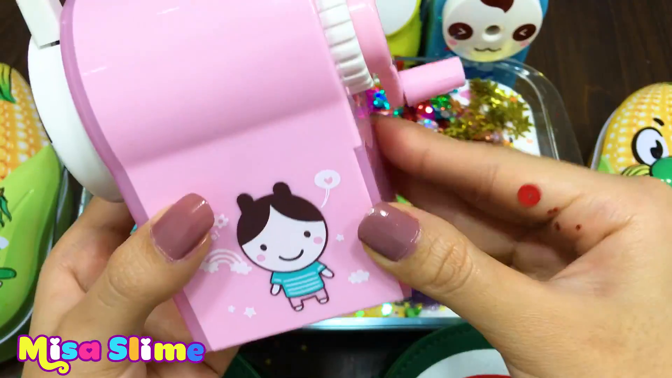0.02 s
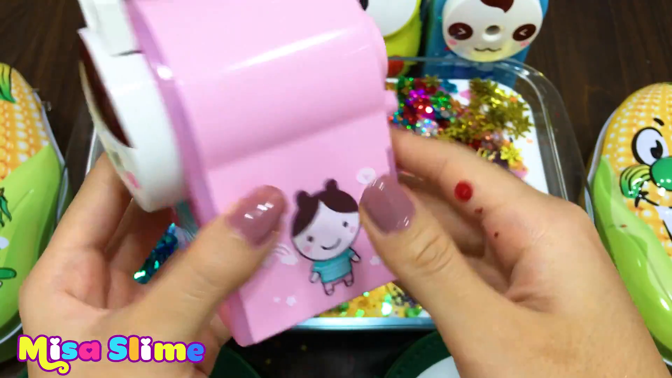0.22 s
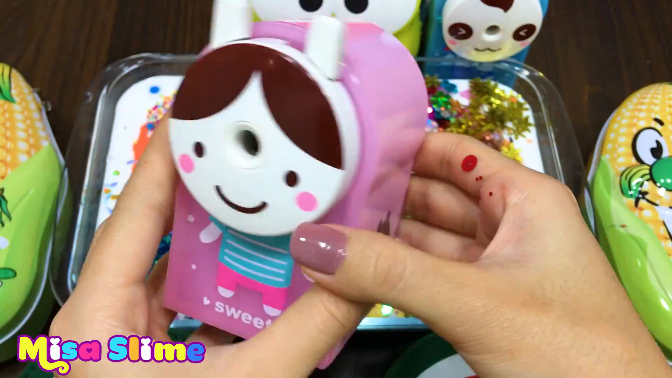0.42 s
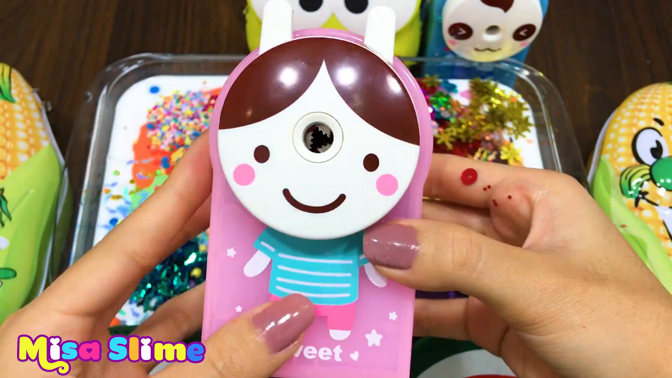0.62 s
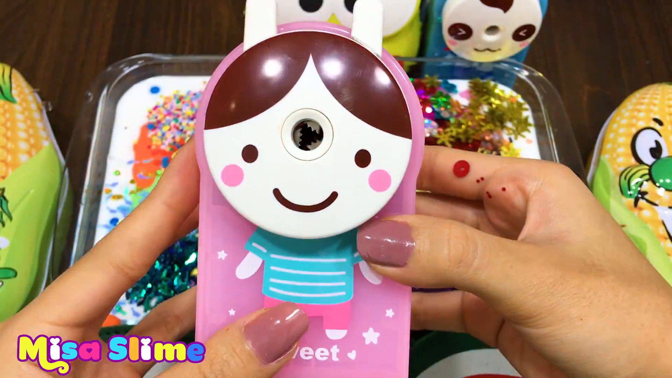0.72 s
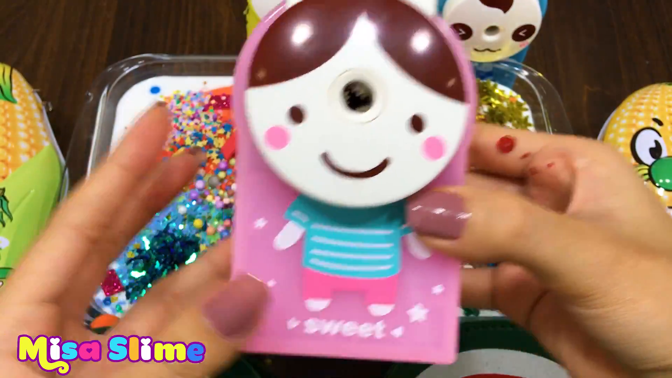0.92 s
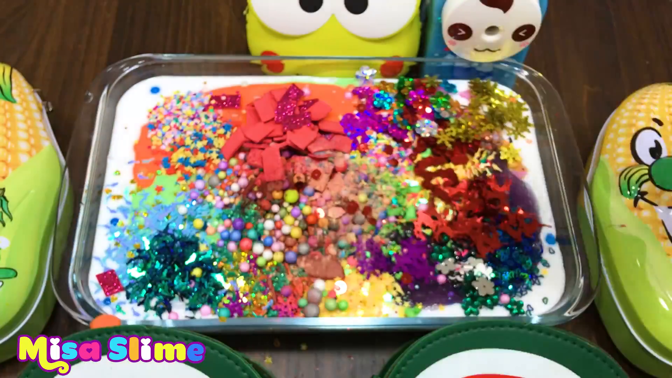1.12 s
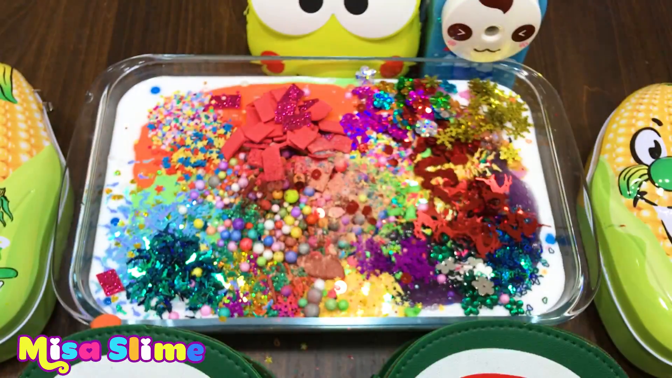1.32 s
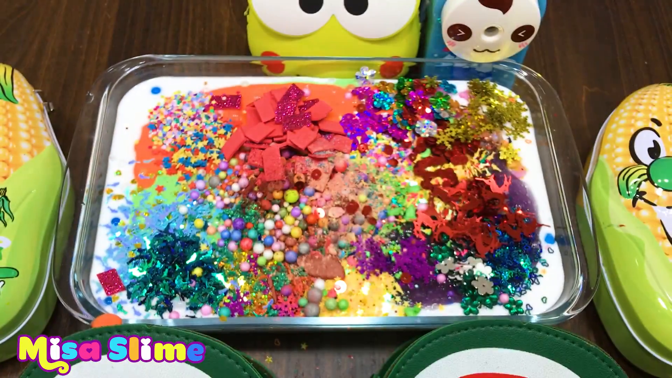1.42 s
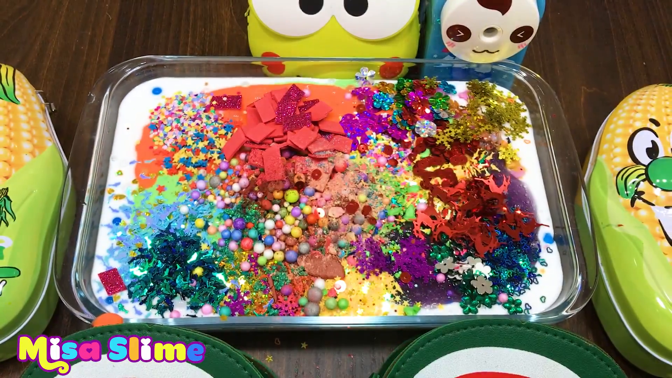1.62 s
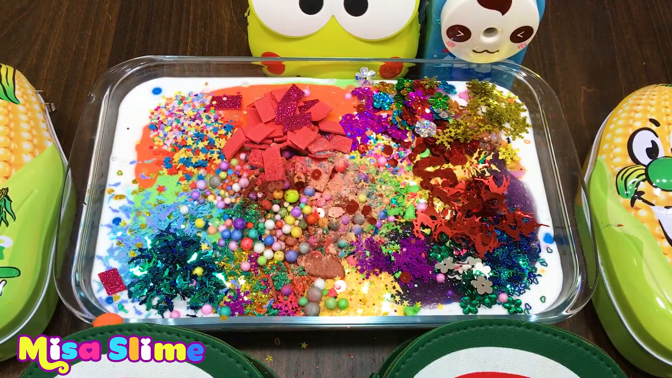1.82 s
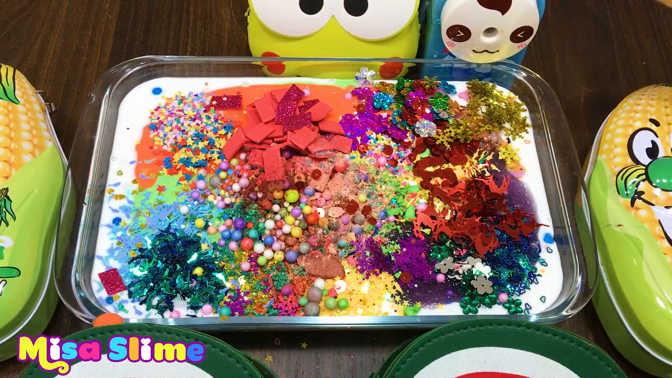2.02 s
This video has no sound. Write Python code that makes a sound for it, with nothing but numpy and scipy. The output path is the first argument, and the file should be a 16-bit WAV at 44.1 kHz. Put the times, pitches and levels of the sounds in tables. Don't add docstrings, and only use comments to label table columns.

```python
import sys
import numpy as np
from scipy import signal
from scipy.fft import rfft, irfft
from scipy.io import wavfile
from scipy.ndimage import uniform_filter1d

SR = 44100
rng = np.random.default_rng(int(sys.argv[2]) if len(sys.argv) > 2 else 0)


def master(y):
    cut = np.clip(np.atleast_2d(y).T, -1, 1)
    pcm = np.round(cut * 32767)
    wavfile.write(sys.argv[1], SR, pcm.astype(np.int16))


def field_ratio(decibels):
    return 10 ** (np.asarray(decibels, dtype=float) / 20)


N = 92610
LEAD = 6615

# ratio_to_pitch, level_db
SHELL_MODES = [(0.997, -5.5), (.66, -17), (1.3, -18), (1.4, -20.5), (1.9, -30)]
# ratio_to_pitch, level_db
EDGE_MODES = [(1, 1.5), (0.81, -8.5), (0.89, -4), (1.2, -4.5), (1.7, -20.5)]


def drawer(crack_db, hold):
    # start_s, peak_db, pitch_hz, ring_s
    slide_knocks = [(0.0238, -31, 993, 0.03), (.184, -33.5, 1900, 0.036), (0.193, -24, 1375, 0.0046),
                    (.197, -22, 2047, 0.017), (0.2185, -23, 2616, 0.008), (0.2205, -11, 1950, 0.023),
                    (.2295, -24.5, 1935, 0.019), (.2415, -20, 1900, 0.0088), (0.2454, -3.5, 1608, 0.01),
                    (0.246, -13, 1073, 0.017), (0.2475, -11, 2150, 0.0097), (0.2483, -8.5, 2708, 0.0072),
                    (.2587, -9.5, 2234, 0.015), (.259, -16, 1303, 0.016), (0.2716, -10, 1405, 0.0081),
                    (0.273, -11.5, 1183, 0.01), (.272, -10, 2225, 0.014)]
    return struck(slide_knocks, SHELL_MODES, crack_db, hold)


def catch(crack_db):
    snap_starts = [.1921, .1995, .2206, .2361, .2414, .2438, .2446, .2453, .2472, .2587, .2716, .2718, .272]
    # peak_db, pitch_hz, ring_s
    snap_sounds = [(-41, 5000, .015), (-43, 6000, 0.0029), (-27.5, 3400, 0.0024), (-34, 5100, 0.006),
                   (-27, 11000, 0.0038), (3, 10600, 0.0075), (-18.5, 5000, 0.006), (-17, 4150, 0.021),
                   (-8, 11400, 0.0056), (-21, 4500, 0.0022), (-7.5, 2700, 0.0027), (-20.5, 5300, 0.012),
                   (-22, 12000, 0.0039)]
    snaps = [(s, *sound) for s, sound in zip(snap_starts, snap_sounds)]
    return struck(snaps, EDGE_MODES, crack_db)


def shell_knocks():
    # start_s, peak_db, pitch_hz, ring_s
    earlier = [
        (-.09, -11, 1030, 0.0058),
        (-.08, -31, 4500, 0.0041),
        (-0.088, -11, 1790, 0.0082),
        (-0.0029, -17.5, 2100, 0.024),
        (-.05, -33.5, 6400, 0.003),
    ]
    # start_s, peak_db, pitch_hz, ring_s
    closing = [(0.023, -28, 2010, 0.018), (0.072, -39, 1930, 0.017), (0.0964, -36.5, 1310, 0.0095),
               (0.1033, -31.5, 1230, 0.01), (0.122, -37, 1270, 0.0095), (0.126, -46, 2060, 0.0092),
               (0.148, -37.5, 1936, 0.047), (0.55, -34, 1750, 0.0054), (0.574, -30.5, 1500, 0.004),
               (0.583, -39, 1490, 0.021), (0.594, -33, 1600, 0.0069), (0.601, -34.5, 1517, 0.012),
               (0.647, -52.5, 1475, 0.012), (0.7204, -31, 1950, 0.007), (0.741, -48, 1400, 0.015),
               (0.768, -31, 1480, 0.0097), (0.785, -36, 1452, 0.0098), (0.794, -42, 1300, 0.008),
               (0.883, -51, 1814, 0.021), (0.903, -52, 1660, 0.016), (0.933, -51, 1797, 0.013)]
    # start_s, peak_db, pitch_hz, ring_s
    setting_aside = [(1.13, -63, 2200, 0.012), (1.142, -58.5, 1698, 0.012), (1.162, -56, 1500, 0.01),
                     (1.182, -52.5, 1206, 0.0089), (1.183, -54, 2480, 0.0082), (1.198, -49.5, 2184, 0.0091),
                     (1.2575, -47, 1997, 0.0055), (1.27, -53, 1300, 0.012), (1.243, -51, 1410, 0.0085),
                     (1.26, -48, 1346, 0.007), (1.268, -47, 2100, 0.0086), (1.363, -53, 3038, 0.008),
                     (1.372, -56, 3200, 0.0082), (1.374, -55.5, 1380, 0.012), (1.44, -54.5, 1400, 0.0093),
                     (1.5103, -35, 1539, 0.0062), (1.5491, -36, 1248, 0.0067), (1.5505, -43, 2490, 0.0068),
                     (1.6631, -30.5, 1875, 0.0157), (1.665, -45.5, 1897, 0.16), (1.676, -41, 1998, 0.014),
                     (1.691, -43.5, 1910, 0.01), (1.702, -44, 1794, 0.0083), (2.029, -68, 1931, 0.008),
                     (2.081, -63, 1650, 0.0088)]
    return sum(struck(rows, SHELL_MODES, crack_db=-14.5) for rows in (earlier, closing, setting_aside))


def edge_ticks():
    # start_s, peak_db, pitch_hz, ring_s
    ticks = [(.1377, -41, 6380, 0.012), (.1431, -41.5, 6350, 0.015), (.147, -43, 6700, 0.0055),
             (.1512, -39, 6780, 0.012), (.158, -46, 5770, .004), (.162, -45, 5000, 0.0048),
             (.5248, -36, 11500, .004), (.5965, -41, 6720, 0.0087), (.601, -35, 6780, 0.0049),
             (.6015, -39.5, 4150, 0.004), (.6013, -47, 12760, 0.0031), (.7201, -34.5, 4310, 0.0038),
             (.7401, -49, 8500, 0.0029), (.7845, -30.5, 6290, 0.0032), (.7848, -33, 4184, 0.015),
             (.9318, -45, 4453, 0.0028), (.9321, -49.5, 11000, 0.0029), (1.0794, -61, 7090, .004),
             (1.1614, -58.5, 4170, 0.0042), (1.2425, -49, 10940, 0.0031), (1.2435, -53.5, 4396, 0.0047),
             (1.2578, -51, 3800, 0.0034), (1.259, -50, 5390, 0.01), (1.2573, -45.5, 11030, 0.0017),
             (1.2676, -45.5, 4050, 0.0044), (1.268, -52.5, 9060, 0.0032), (1.5099, -38, 8600, .0028),
             (1.5104, -39, 4500, 0.0036), (1.5433, -41.5, 4405, 0.0042), (1.664, -42, 4750, 0.016),
             (1.6635, -37, 8960, .0028), (1.6894, -47, 6800, 0.0055), (2.0824, -56, 4890, .004)]
    return struck(ticks, EDGE_MODES, crack_db=-8.5)


def body_thuds():
    # start_s, peak_db, pitch_hz, ring_s
    thuds = [(.2, -43, 318, 0.056), (.221, -37, 333, 0.046), (.2455, -19, 664, 0.028),
             (.272, -25.5, 260, 0.038), (.272, -42, 136.3, 0.081), (.532, -43.5, 294, 0.025),
             (.5745, -36.5, 329, 0.02), (.595, -47, 286, 0.03), (.768, -44, 330, 0.025),
             (.784, -48, 459, 0.022), (.95, -49.5, 70.2, 0.052), (1.365, -54, 160, 0.058)]
    return struck(thuds, [(1, -9), (1.6, -13.5)], crack_db=-28.5)


def rubs():
    stroke_starts = [.03, .085, .135, .172, .185, .505, .73, .885, 1.13, 1.358, 1.362, 1.445, 1.512, 1.664,
                     1.666, 1.69, 1.17, 1.53]
    # length_s, level_db, centre_hz
    strokes = [(0.1, -63.5, 9800), (0.03, -68, 7000), (0.01, -55, 12000), (0.2, -41.5, 1300),
               (0.047, -51.5, 29000), (0.065, -57.5, 8700), (0.053, -67, 11800), (0.024, -63, 7200),
               (0.3, -76.5, 1500), (0.039, -64.5, 1360), (0.029, -67, 9770), (0.029, -63.5, 6100),
               (0.13, -59.5, 1600), (0.049, -55.5, 6700), (0.068, -59.5, 1570), (0.14, -59, 1010),
               (0.4, -73.5, 1340), (0.1335, -67.5, 300)]
    size, width, grain_db = 16384, 0.55, 0.5
    out = np.zeros(N + LEAD)
    for s, (length_s, level_db, centre_hz) in zip(stroke_starts, strokes):
        noise = shaped(size, lambda hz: np.exp(-(np.log((hz + 1) / centre_hz) / width) ** 2 / 2))
        roughness = evened(uniform_filter1d(rng.standard_normal(size), size=90))
        friction = evened(noise * field_ratio(grain_db * roughness))
        progress = np.clip(np.arange(size) / SR / length_s, 0, 1)
        stroke = (4 * progress * (1 - progress)) ** 0.78
        add(out, s, field_ratio(level_db) * stroke * friction)
    return out


def struck(rows, modes, crack_db, hold=1.367):
    out = np.zeros(N + LEAD)
    for s, peak_db, pitch_hz, ring_s in rows:
        add(out, s, tap(peak_db, pitch_hz, ring_s, modes, crack_db, hold))
    return out


def tap(peak_db, pitch_hz, ring_s, modes, crack_db, hold):
    size = 6000
    t = np.arange(size) / SR
    scatter_db, rise_s, crack_s = 4.5, 0.0004, 0.0014
    luck = rng.uniform(-0.84, 1, (len(modes), 3))
    luck[0] = 0
    ring = np.zeros(size)
    for (ratio, mode_db), (detune, louder, phase) in zip(modes, luck):
        hz = min(pitch_hz * ratio * (1 + 0.091 * detune), 16000)
        age = t * (1 + abs(np.log(ratio))) / max(ring_s, 0.002)
        fall_db = 60 * age ** hold
        ring += field_ratio(mode_db + scatter_db * louder - fall_db) * np.sin(2 * np.pi * hz * t + phase)

    def crack_band(hz):
        above_foot = hz ** 3 / (hz ** 3 + (0.6 * pitch_hz) ** 3)
        return above_foot / (1 + (hz / (2.3 * pitch_hz)) ** 3)

    crack = field_ratio(crack_db) * shaped(size, crack_band) * np.exp(-t / crack_s)
    sound = (1 - np.exp(-t / rise_s)) * (ring + crack)
    return field_ratio(peak_db) * sound / abs(sound).max()


def add(mix, s, sound):
    part = mix[LEAD + round(s * SR):][:len(sound)]
    part += sound[:len(part)]


def shaped(size, gain):
    hz = np.fft.rfftfreq(size, 1 / SR)
    return evened(irfft(rfft(rng.standard_normal(size)) * gain(hz), size))


def evened(x):
    return x / np.sqrt(np.mean(x ** 2) + 1e-20)


def read(points, hz):
    f, value = np.transpose(points)
    return np.interp(np.log(hz + 1), np.log(f + 1), value)


def room(x):
    # pitch_hz, t60_s
    decay = [(150, 1), (300, 0.51), (550, 0.45), (1000, 0.88), (2500, 0.85), (5000, 0.66), (9000, 0.68),
             (11500, 0.54), (15000, 0.61)]
    # pitch_hz, level_db
    colour = [(100, -17.5), (350, 3.5), (700, -4.5), (1500, -8), (4000, -2), (9000, 0.5), (11500, 0),
              (14000, -8), (16000, -9.5)]
    frame, gap_s, swell_s = 256, 0.0018, 0.00067
    hz, t, z = signal.stft(rng.standard_normal(SR + SR // 2), SR, nperseg=frame)
    z = z * field_ratio(-60 * t / read(decay, hz)[:, None])
    uncoloured = np.linalg.norm(signal.istft(z, SR, nperseg=frame)[1])
    tail = signal.istft(z * field_ratio(read(colour, hz))[:, None], SR, nperseg=frame)[1]
    since_gap = np.maximum(np.arange(len(tail)) / SR - gap_s, 0)
    tail = tail * (1 - np.exp(-since_gap / swell_s))
    return signal.fftconvolve(x, tail / uncoloured)[:len(x)]


def air():
    # start_s, level_db
    rumble_swell = [(0.0, -71), (0.27, -69.5), (0.41, -71), (0.54, -73.5), (1.06, -78), (1.41, -70),
                    (1.7, -70), (1.85, -75.5), (2.1, -77.5)]
    # pitch_hz, level_db (per Hz)
    hiss_colour = [(15, -61), (25, -33), (59, -10), (270, -10), (301, -9.5), (427, -13), (624, -22),
                   (734, -19), (3500, -26), (16000, -31.5)]
    hiss_db, rumble_db, rumble_hz, lump_db, lump_hz = -66, -71.5, 77, 3, 6
    s, db = np.transpose(rumble_swell)
    swell_db = np.interp(np.arange(N) / SR, s, db - np.mean(db))
    hiss = shaped(N, lambda hz: field_ratio(read(hiss_colour, hz)))
    rumble = shaped(N, lambda hz: np.exp(-(np.log((hz + 1) / rumble_hz) / 0.41) ** 2 / 2))
    swell_db = swell_db + lump_db * shaped(N, lambda hz: (hz > 0.5) / (1 + (hz / lump_hz) ** 4))
    hiss_follows = 0.14
    return field_ratio(hiss_db + hiss_follows * swell_db) * hiss + field_ratio(rumble_db + swell_db) * rumble


def scene():
    near = drawer(crack_db=-13.5, hold=1.47) + shell_knocks() + edge_ticks() + body_thuds() + rubs()
    sent = near + field_ratio(-8) * catch(crack_db=6) + field_ratio(-8) * drawer(crack_db=8, hold=1.367)
    turn = 2 * np.pi * 19 * np.arange(N + LEAD) / SR
    wet = room(sent * np.cos(turn)) + room(sent * np.sin(turn))
    contacts = near + catch(crack_db=-6) + field_ratio(-4.5) * wet
    small_body = signal.butter(2, 150, "high", fs=SR, output="sos")
    return (signal.sosfilt(small_body, contacts)[LEAD:] + air())[None]


def roll_off(x):
    return signal.sosfilt(signal.butter(12, 16520, fs=SR, output="sos"), x)


def record(dry):
    band_limit = signal.firwin(255, 16400, fs=SR)[None]
    mix = np.clip(signal.oaconvolve(dry, band_limit, "same"), -1, 1)
    return roll_off(mix)


dry = scene()
out = record(dry)
master(out)
```